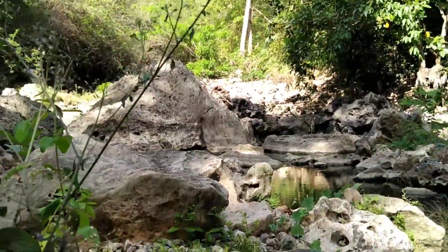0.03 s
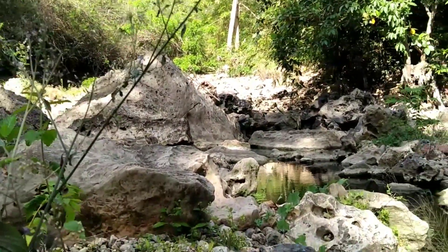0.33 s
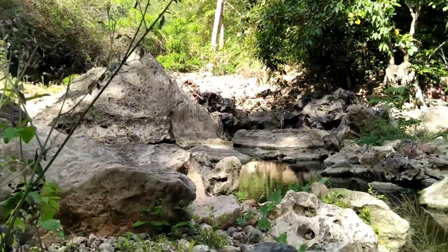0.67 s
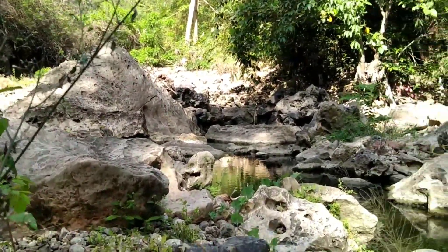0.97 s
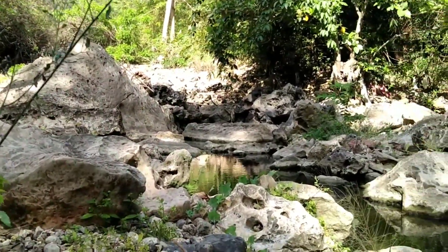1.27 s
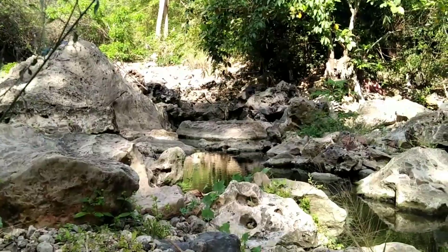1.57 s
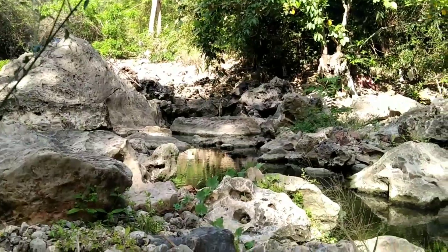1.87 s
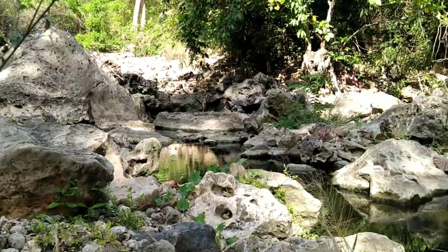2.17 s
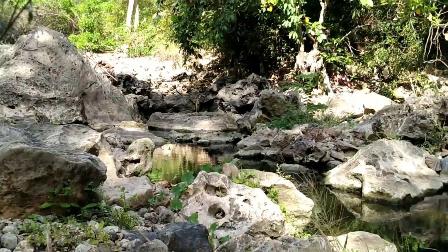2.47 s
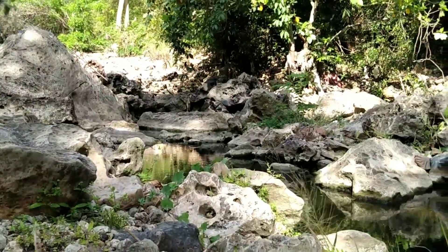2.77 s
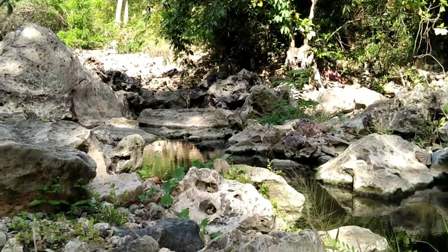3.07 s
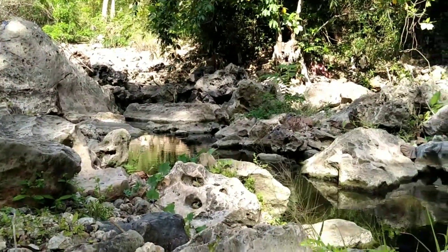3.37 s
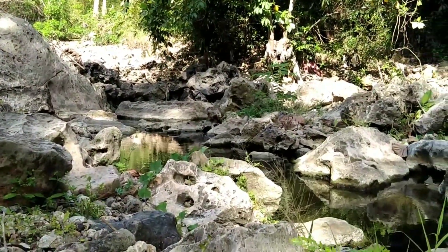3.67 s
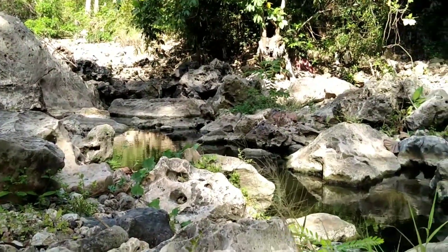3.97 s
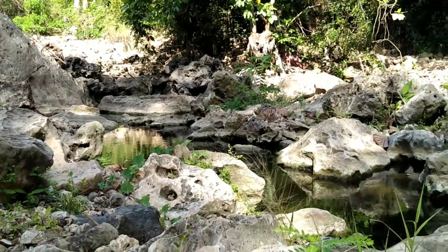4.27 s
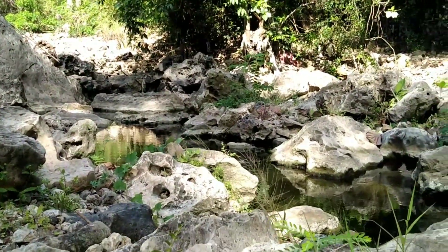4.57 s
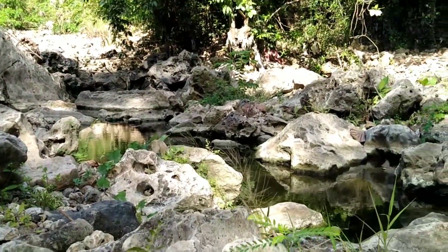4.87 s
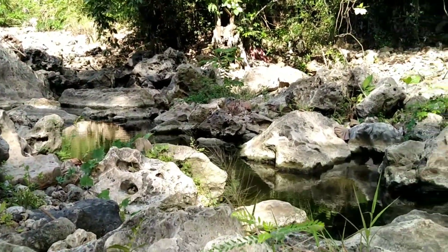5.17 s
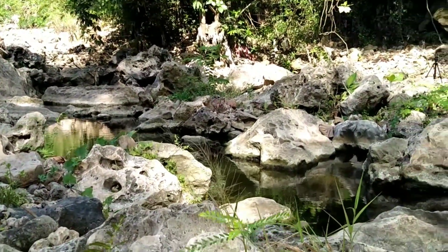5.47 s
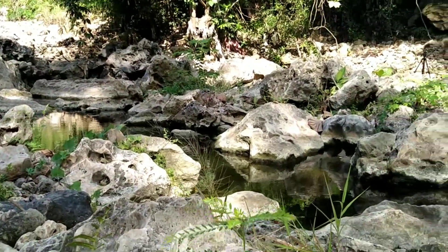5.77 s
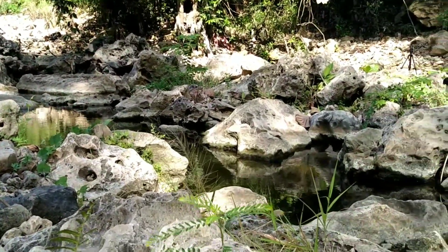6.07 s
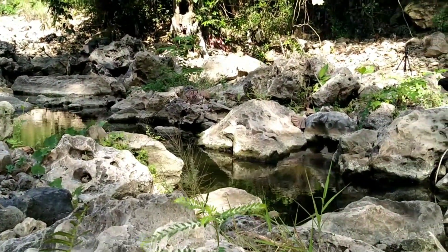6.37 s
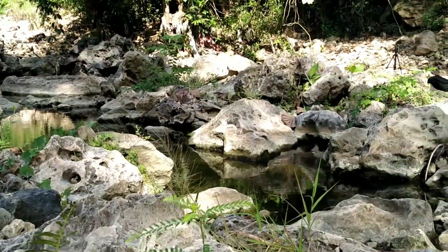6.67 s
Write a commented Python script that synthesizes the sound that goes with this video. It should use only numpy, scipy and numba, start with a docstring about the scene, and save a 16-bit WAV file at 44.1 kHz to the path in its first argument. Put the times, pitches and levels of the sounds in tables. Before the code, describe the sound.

A small creek trickles and plinks among rocks over a low, distant engine hum, both gradually fading away.

```python
"""A small creek trickles between limestone rocks: bubbles ring as short rising plinks, drops spatter on
wet stone and air pockets under the stones gurgle. Far off, one engine pulls and changes gear while
another drones on. A low rumble lies underneath, and the hand-held microphone takes a few soft bumps.
Late on a bird whistles faintly, as the water, the engines and the rumble sink away."""
import sys
import numpy as np
from scipy import signal
from scipy.fft import rfft, irfft, next_fast_len
from scipy.io import wavfile
from scipy.ndimage import uniform_filter1d
from numba import njit

SR = 44100
rng = np.random.default_rng(int(sys.argv[2]) if len(sys.argv) > 2 else 0)


def materialize(psi):
    """Save the field psi as 16-bit PCM at rate SR to the path in sys.argv[1].

    A 1-D psi becomes a single channel; in a 2-D psi each row is a channel.
    """
    bounded = np.clip(np.atleast_2d(psi).T, -1, 1)
    quanta = np.round(bounded * 32767).astype(np.int16)
    wavfile.write(sys.argv[1], SR, quanta)


N = 305172
TIME = np.arange(N) / SR


def undb(db):
    """Decibels to gain."""
    return 10 ** (np.asarray(db) / 20)


def unit(x):
    """Scale to rms 1."""
    return x / np.sqrt(np.mean(x ** 2))


def curves(table):
    """Turn rows that start with a time into one automation curve per remaining column."""
    times, *columns = np.transpose(table)
    return [np.interp(TIME, times, column) for column in columns]


def colour(x, points):
    """EQ through (Hz, dB) points; minimum phase, so attacks stay sharp."""
    size = next_fast_len(N + 4096)
    size += size % 2
    bin_hz = np.arange(size // 2 + 1) * SR / size
    hz, db = np.transpose(points)
    gain = undb(np.interp(np.log(bin_hz + 1), np.log(hz), db))
    cepstrum = irfft(np.log(gain))
    cepstrum[1:size // 2] *= 2
    cepstrum[size // 2 + 1:] = 0
    return irfft(rfft(x, size) * np.exp(rfft(cepstrum)))[..., :N]


def walk(rate):
    """Smooth random modulation at rms 1, with `rate` new values a second."""
    hold = max(int(SR / rate), 1)
    steps = np.repeat(rng.standard_normal(N // hold + 1), hold)
    return unit(uniform_filter1d(uniform_filter1d(steps, hold), hold)[:N])


def sides(pan_db):
    """Left and right gains; a positive pan leans left."""
    return undb(np.array([pan_db, -pan_db]) / 2)


@njit
def ring(start, hz, t60, gains, lag, rise, onset_cycles):
    """Damped sines that climb as each bubble nears the surface; the right ear's phase trails by lag s."""
    out = np.zeros((2, N))
    for k in range(len(start)):
        first, phase, envelope = int(start[k] * SR), 0., 1.
        length = t60[k] * SR
        decay = np.exp(-np.log(1000) / length)
        shift = 2 * np.pi * hz[k] * lag[k]
        for i in range(max(first, 0), min(first + int(length), N)):
            phase += 2 * np.pi * hz[k] * (1 + rise * (i - first) / length) / SR
            envelope *= decay
            swing = envelope * (1 - np.exp(-phase / (2 * np.pi * onset_cycles)))  # the bubble pinches off
            out[0, i] += gains[0, k] * swing * np.sin(phase)
            out[1, i] += gains[1, k] * swing * np.sin(phase - shift)
    return out


def swarm(count, low_hz, high_hz, cycles, spread_db, clump_db, lag_ms, rise, width_db=3.5):
    """Bubbles of random size and place, shed in bunches; most are faint, a few stand out."""
    when, pitch, strength = rng.random((count, 3)).T
    life, pan, lag = rng.standard_normal((count, 3)).T
    shedding = np.cumsum(undb(clump_db * walk(45)))
    start = np.searchsorted(shedding, when * shedding[-1]) / SR
    hz = low_hz * (high_hz / low_hz) ** pitch
    t60 = cycles * np.exp(0.4 * life) / hz
    # small bubbles die sooner: weighting by pitch keeps the power per Hz even
    gains = undb(-spread_db * np.log(strength + 0.018)) * hz * sides(width_db * pan - 2.0)
    lag_s = lag_ms * (lag + 1.44) / 1000
    return unit(ring(start, hz, t60, gains, lag_s, rise, onset_cycles=0.35))


def spatter(count=900, decay_s=.00035):
    """Tiny drops tick on wet stone, a few of them loudly; each ear catches its own reflection."""
    when, strength = rng.random((count, 2)).T
    t = np.arange(48) / SR
    envelopes = np.exp(-t / decay_s) * undb(-5.0 * np.log(strength + .014))[:, None]
    common, left, right = rng.standard_normal((count, 3, len(t))).transpose(1, 0, 2)
    ticks = (0.09 * common + np.array([left, right])) * envelopes
    index = (when[:, None] * (N - len(t))).astype(int) + np.arange(len(t))
    out = np.array([np.bincount(index.ravel(), ear.ravel(), N) for ear in ticks])
    return unit(colour(out, [(1000, -11), (4000, -10.5), (8000, -5.5), (12000, -5)]))


def trickle(spatter_db=-4, wash_db=-3.5):
    """Countless bubbles, fine spatter and the blurred wash from upstream; small surges lift them all."""
    # The tone of the running water. Each row: frequency in Hz, gain in dB.
    water_eq = [(200, -0.5), (330, -9), (420, -2), (510, -10), (700, 0), (940, -4), (1300, 0.5), (1550, -2),
                (2500, -1), (3800, -5), (5500, -5.5), (8500, -10), (12000, -6.5), (15500, -14)]
    bubbles = swarm(count=13000, low_hz=283.2, high_hz=10500, cycles=40,
                    spread_db=3.0, clump_db=1.4, lag_ms=0.019, rise=0.08)
    mid, side = rng.standard_normal((2, N))
    mid = colour(mid, [(300, 0.5), (5000, 7.5), (12000, -2.0)])
    side = colour(side, [(300, 0.5), (1500, -29), (4000, -26.0), (12000, -8.5)])
    wash = unit(np.array([mid - side, mid + side]))
    surge = unit(walk(14) + walk(35) + walk(80))
    splash = undb(spatter_db + 2.4 * surge) * spatter() + undb(wash_db + 2.3 * surge) * wash
    water = bubbles * undb(.5 * surge) + splash * sides(-1.9)[:, None]
    return unit(colour(water, water_eq))


def gurgle():
    """Larger bubbles ring the air pockets between the stones."""
    # Air pocket resonances. Each row: centre in Hz, bandwidth in Hz, relative level in dB.
    hollows = [(414, 69, -6.5), (702, 122, -1), (745, 70, -1.5), (1131, 75, 4), (1265, 25, -2.5)]
    glugs = swarm(count=2000, low_hz=367.6, high_hz=1447, cycles=19,
                  spread_db=2.0, clump_db=2, lag_ms=0.016, rise=0.04)
    return unit(sum(undb(db) * signal.lfilter(*signal.iirpeak(hz, hz / width, fs=SR), glugs)
                    for hz, width, db in hollows))


def plinks(starts, hz, level_db, cycles=44, rise=.38, width_db=1.5, lag_ms=.007):
    """Near bubbles chirp upward, each from its own place; the small, high ones die sooner."""
    pan, lag = rng.standard_normal((len(starts), 2)).T
    start_hz = hz * (1 - rise / np.log(1000))  # each chirp starts just under its mean pitch
    gains = undb(level_db) * sides(width_db * pan)
    lag_s = lag_ms * (1 + lag) / 1000
    return ring(starts, start_hz, cycles / hz, gains, lag_s, rise, onset_cycles=0.84)


def splats(starts, level_db, snap_s=.00045, tail_s=0.018, tail_db=-14, width=.8):
    """A drop bursts on stone: a sharp snap, then a short tail of droplets."""
    t = np.arange(2048) / SR
    envelope = np.exp(-t / snap_s) + undb(tail_db) * np.exp(-t / tail_s)
    out = np.zeros((2, N + len(t)))
    for i, db in zip((starts * SR).astype(int), level_db):
        common, left, right = rng.standard_normal((3, len(t)))
        crack = (common + width * np.array([left, right])) * envelope
        out[:, i:i + len(t)] += crack / abs(crack).max() * undb(db)
    return colour(out[:, :N], [(500, -30), (3000, 6.5), (7000, 6), (11000, 7.0), (15500, 6)])


def sprinkle(count, db, spread_db):
    """Loosely spaced start times, levels around db, and a random size from 0 to 1 for each drip."""
    when, loudness, size = rng.random((count, 3)).T
    starts = (np.arange(count) + when) / count * N / SR
    return starts, db + spread_db * (2 * loudness - 1), size


def lesser_drips(low_hz=1200, high_hz=8000, db_per_octave=1.5):
    """Quieter plinks and splats keep coming at random; the small, short bubbles peak higher."""
    starts, level_db, size = sprinkle(count=46, db=-37.0, spread_db=1.0)
    hz = high_hz * (low_hz / high_hz) ** size
    bubbles = plinks(starts, hz, level_db + db_per_octave * np.log2(hz / high_hz))
    starts, level_db, _ = sprinkle(count=18, db=-48, spread_db=2.0)
    return bubbles + splats(starts, level_db)


def loud_drips(plink_db=2.0, splat_db=1.0):
    """The foreground bubbles and drops that stand out from the flow."""
    # Close bubbles. Each row: start in seconds, pitch in Hz, relative level in dB.
    plink_cues = [(0.106, 1485, -35.5), (0.114, 7600, -39), (0.475, 5710, -37), (0.57, 680, -43.5),
                  (0.683, 692, -41.5), (0.934, 2420, -38.5), (1.119, 4720, -35.5), (1.202, 3490, -32),
                  (1.254, 1350, -38.5), (1.312, 4970, -33), (1.434, 1800, -36.5), (1.533, 5025, -34),
                  (1.679, 4360, -38), (1.922, 2671, -35), (1.939, 2550, -36.5), (2.029, 1630, -38.5),
                  (2.48, 450, -47.5), (2.55, 2010, -40), (2.717, 8600, -36), (2.805, 1130, -40.5),
                  (3.005, 4997, -38), (3.201, 5750, -31), (3.261, 4560, -35.5), (3.262, 8260, -32),
                  (3.798, 3530, -35.5), (4.119, 3108, -31.5), (4.869, 3680, -40.5), (4.91, 3000, -40),
                  (4.951, 690, -48), (5.009, 4157, -40.5), (5.05, 3570, -36.5), (5.238, 2140, -34),
                  (5.402, 748.7, -42), (5.626, 5870, -38.5), (5.697, 3300, -43), (6.114, 720, -46.5),
                  (6.581, 3304, -44.5)]
    # Drops bursting on stone. Each row: start in seconds, relative level in dB.
    splat_cues = [(0.112, -33), (0.3494, -40), (1.6729, -42), (1.9909, -32.5), (2.8264, -37), (3.019, -40),
                  (3.261, -38), (3.5125, -39), (3.8808, -33.5), (3.916, -41), (3.9426, -36), (4.117, -38),
                  (5.0626, -40)]
    starts, hz, level_db = np.transpose(plink_cues)
    bubbles = plinks(starts, hz, level_db + plink_db)
    starts, level_db = np.transpose(splat_cues)
    return bubbles + splats(starts, level_db + splat_db)


def reflections(x, t60, wet_db):
    """Boulders or trees scatter the sound back as a short, diffuse tail."""
    t = np.arange(SR // 5) / SR
    echoes = rng.standard_normal((2, len(t))) * np.exp(-np.log(1000) * t / t60) * (t > .002)
    echoes *= undb(wet_db) / np.sqrt(np.sum(echoes ** 2, axis=1, keepdims=True))
    return x + signal.fftconvolve(x, echoes, axes=1)[:, :N]


def engine_orders(hz, orders, jitter, waver_db=1.5):
    """Sines on multiples of a running speed; moving air makes each one waver, the high ones most."""
    phase = 2 * np.pi * np.cumsum(hz * (1 + jitter * walk(12))) / SR
    out = np.zeros(N)
    for order, db in orders:
        scatter = np.clip((order * np.mean(hz) / 330) ** 3, 0, 1)  # fully scattered from 330 Hz up
        direct = np.sqrt(1 - scatter) * undb(waver_db * walk(11))
        diffuse = np.sqrt(scatter / 2) * (walk(40) + 1j * walk(40))
        tone = np.exp(1j * (order * phase + 2 * np.pi * rng.random()))
        out += np.sqrt(2) * undb(db) * np.imag((direct + diffuse) * tone)
    return out


def shifting_engine(shift_s=1.804, boom_db=10, boom_order=3, dull_db_per_octave=14):
    """A far engine changes gear: as the throttle closes the exhaust booms and the upper orders die."""
    # The drive. Each row: time in seconds, cycle rate in Hz, relative level in dB,
    # load from 0 (cruising) to 1 (pulling).
    drive = [(0, 29.96, -46.5, 0.62), (.6, 31.44, -52.5, 0.96), (1.1, 32.58, -49, 0.83),
             (1.78, 34.39, -45.5, 0.7), (1.87, 31.95, -44, 0.69), (2.3, 25.2, -45.5, 0.17),
             (2.6, 24.9, -44, .02), (4.4, 24.93, -43, 0.039), (4.7, 24.6, -43.5, .22),
             (5.3, 23.94, -46.5, 0.29), (6.2, 23.36, -45, 0.095), (6.92, 21.4, -47, 0.09)]
    # Exhaust orders. Each row: multiple of the cycle rate, gain in dB pulling, gain in dB cruising.
    exhaust = [(2, 0, -28), (3, 4, -12), (4, 0.5, -4.5), (5, -5, 1.5), (6, -2.5, -16.5), (7, -9, -11.5),
               (8, -12, -26), (9, -10, -29), (10, -11, -37), (11, -11.5, -21), (12, -8.5, -31.5),
               (13, -15, -30)]
    hz, db, load = curves(drive)
    attack_s, hold_s, release_s = 0.026, 0.1, 0.5
    boom = np.interp(TIME, shift_s + np.cumsum([0, attack_s, hold_s, release_s]), [0, 1, 1, 0])
    orders = []
    for order, pulling_db, cruising_db in exhaust:
        load_db = load * pulling_db + (1 - load) * cruising_db
        shift_db = boom * (boom_db - dull_db_per_octave * abs(np.log2(order / boom_order)))
        orders.append((order, db + load_db + shift_db))
    return engine_orders(hz, orders, jitter=0.0051)


def droning_engine():
    """A second far engine runs at a near-steady speed; only its low orders carry."""
    # Its slow drift. Each row: time in seconds, firing rate in Hz, relative level in dB.
    drift = [(0, 51.18, -50), (.9, 51.25, -45.5), (1.6, 52.34, -52.5), (2.6, 53.38, -52.5),
             (4.5, 52.42, -47.5), (5, 51.14, -51.5), (5.3, 49.3, -48.5), (6.92, 49.07, -49.5)]
    # Its harmonics. Each row: multiple of the firing rate, gain in dB.
    harmonics = [(1, 2.5), (2, -1.5), (3, -14.5), (4, -1.5), (5, -17.5)]
    hz, db = curves(drift)
    return engine_orders(hz, [(order, db + gain_db) for order, gain_db in harmonics], jitter=0.0041)


def rumble():
    """A blurred low rumble, alike in both ears, swelling late as the microphone is handled."""
    # The rumble's tone. Each row: frequency in Hz, gain in dB.
    rumble_eq = [(8, -1), (22, 4), (35, -8.5), (60, -4.5), (100, 5.5), (150, -5.5), (220, -6.5),
                 (300, -21.5), (500, -30.5)]
    # Its level, with the late handling swell. Each row: time in seconds, relative level in dB.
    levels = [(0, 0), (2, 1), (3.2, 0), (4.7, 1.5), (5.3, 4.5), (6.92, -1.5)]
    return unit(colour(rng.standard_normal(N), rumble_eq)) * undb(curves(levels)[0])


def bumps(thud_s=0.064, knock_s=0.024):
    """The hand rocks the microphone for a few cycles; a harder touch also knocks its housing."""
    # Handling bumps. Each row: centre in seconds, thud pitch in Hz, thud level in dB,
    # knock in dB relative to the thud.
    touches = [(1.875, 89, -44, -27), (3.694, 81, -39, -20), (4.706, 67.64, -37, -25),
               (5.07, 70.7, -36.5, -28), (5.586, 97.3, -38, -27), (5.661, 108, -42.5, 4),
               (5.762, 98.5, -42, -8), (6.091, 113, -35.5, -4.5)]
    # The housing's resonances. Each row: pitch in Hz, gain in dB.
    housing = [(190, 1.5), (310, -9.5)]
    out = np.zeros(N)
    for centre_s, thud_hz, thud_db, knock_db in touches:
        t = TIME - centre_s
        knocks = [(hz, knock_db + db, knock_s) for hz, db in housing]
        for hz, db, length in [(thud_hz, 0, thud_s)] + knocks:
            on = abs(t) < length / 2
            window = np.cos(np.pi * t[on] / length) ** 2
            out[on] += undb(thud_db + db) * window * np.sin(2 * np.pi * hz * t[on])
    return out


def bird(quaver=.028):
    """A far bird's thin, quavering whistles, smeared by the trees."""
    # Whistles. Each row: start in seconds, length in seconds, first and last pitch in Hz, dry level in dB.
    calls = [(4.773, 0.11, 2440, 2400, -69), (5.358, 0.29, 2460, 2650, -63.5),
             (5.971, .33, 2405, 3170, -64.5)]
    out = np.zeros(N)
    for start, length, from_hz, to_hz, db in calls:
        along = np.clip((TIME - start) / length, 0, 1)
        hz = (from_hz + (to_hz - from_hz) * along) * (1 + quaver * walk(170))
        out += undb(db) * np.sin(np.pi * along) * np.sin(2 * np.pi * np.cumsum(hz) / SR)
    return reflections(np.array([out, out]), t60=.5, wet_db=0)


def scene(trickle_db=-51, gurgle_db=-58.5, engines_db=-5, rumble_db=-50.5):
    """The creek up close over a low bed; in the fade the lesser drips go first, the gurgle last."""
    fade_start_s, fade_db_per_s = 4.2, 4.5
    fade = undb(-fade_db_per_s * np.maximum(TIME - fade_start_s, 0))
    creek = undb(trickle_db) * trickle() * fade
    creek += undb(gurgle_db) * gurgle() * fade ** 0.83
    creek += lesser_drips() * fade ** 2
    near = reflections(creek + loud_drips(), t60=.06, wet_db=-13)  # off the boulders
    bed = undb(engines_db) * (shifting_engine() + droning_engine()) + undb(rumble_db) * rumble()
    return near + bed * fade + bird() + bumps()


def record(dry, top_hz=15350):
    """A steep low-pass takes off the highest treble."""
    return signal.sosfilt(signal.ellip(10, .2, 80, top_hz, fs=SR, output="sos"), dry)


dry = scene()
out = record(dry)
materialize(out)
```